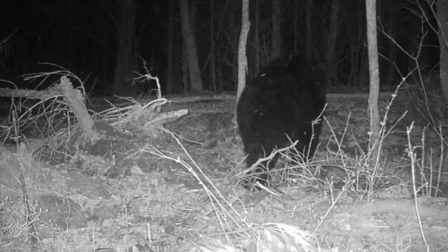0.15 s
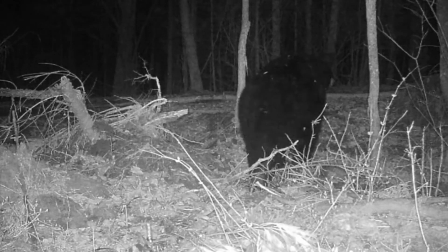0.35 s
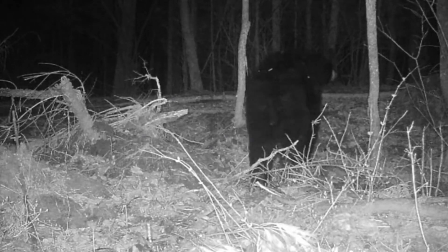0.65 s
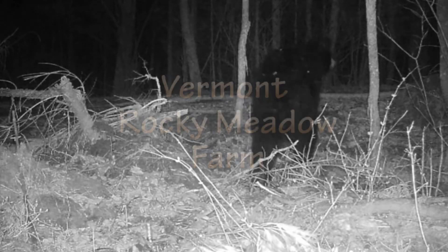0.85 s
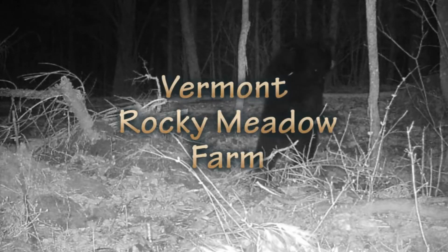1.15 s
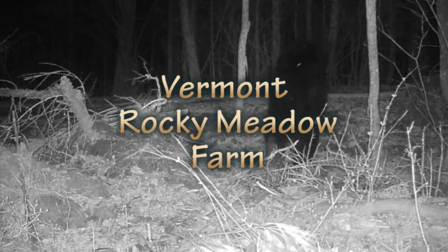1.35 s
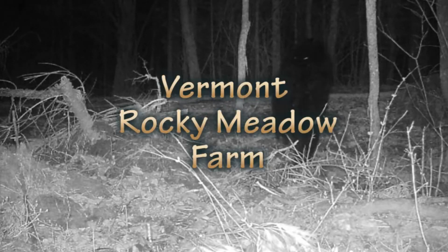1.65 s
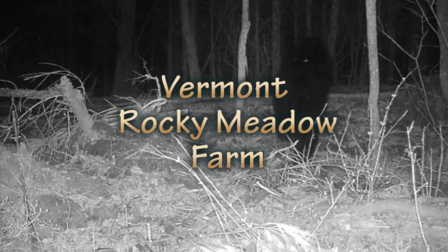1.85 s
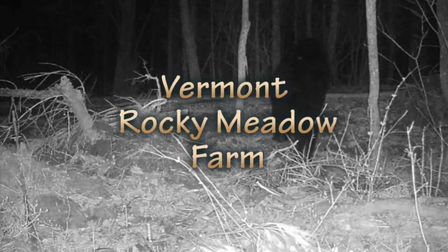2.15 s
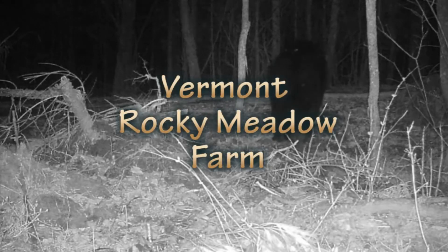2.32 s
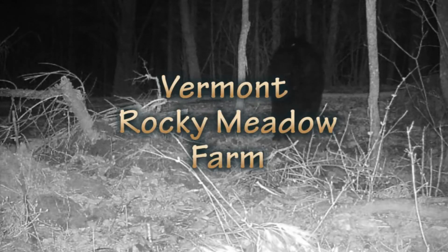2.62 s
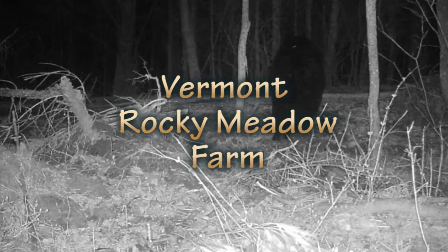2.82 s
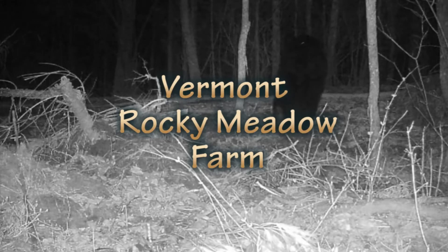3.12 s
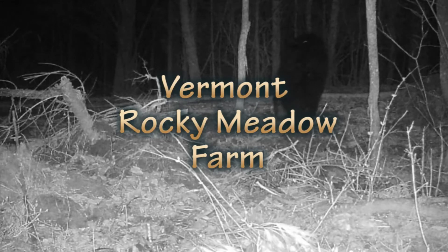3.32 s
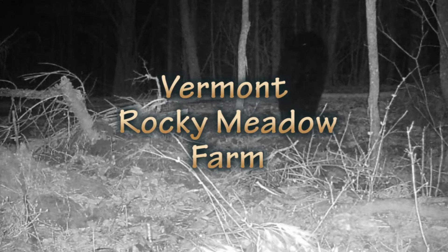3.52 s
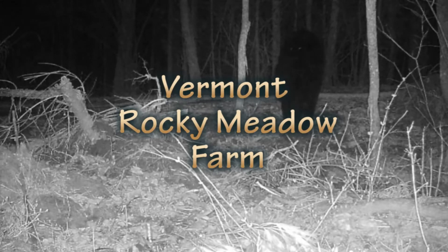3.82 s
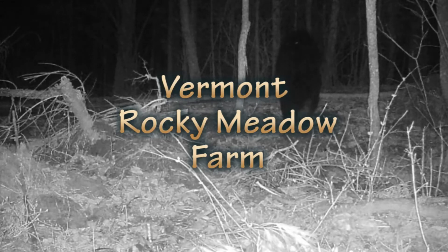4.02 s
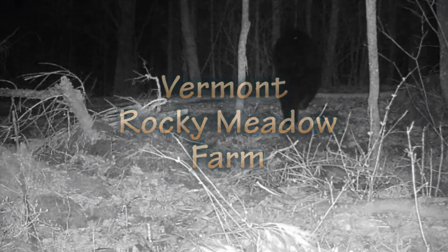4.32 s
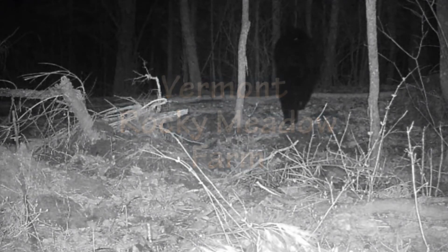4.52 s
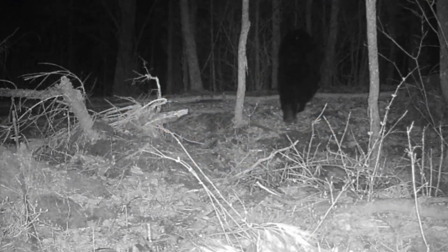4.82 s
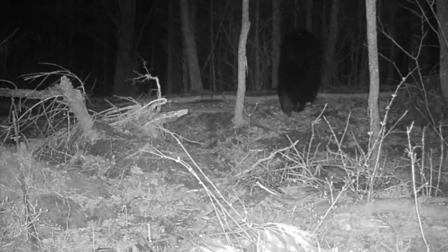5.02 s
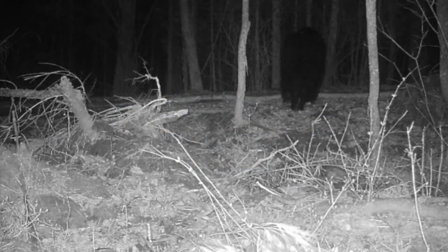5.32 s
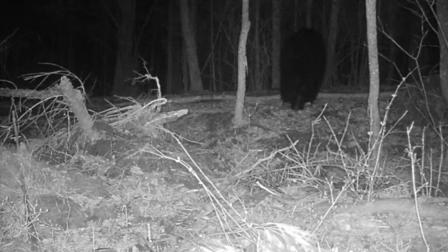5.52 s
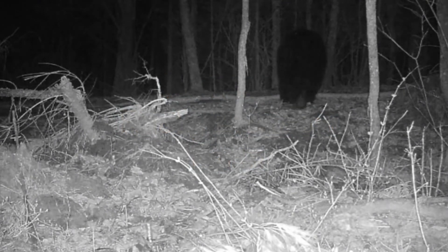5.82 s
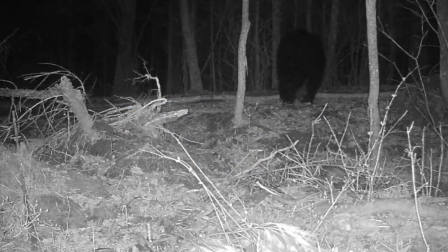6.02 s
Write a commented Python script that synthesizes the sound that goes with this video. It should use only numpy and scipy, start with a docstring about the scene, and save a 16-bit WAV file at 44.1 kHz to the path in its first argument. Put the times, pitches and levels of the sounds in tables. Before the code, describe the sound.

At night in the woods, two owls duet, one hooting a quick clear run, the other cackling hoarsely, over close pulsing cricket chirps.

```python
"""In the woods at night, two owls duet: one hoots a quick run of pure arched notes, the other gives
hoarser cackles and ends on a note that leaps up and falls away. Both are gliding tones with harmonics
shaped by a throat, and trunks scatter the calls into a long tail. A tree cricket chirps close to a
pair of microphones, its wings ringing and rasping at each stroke. Farther crickets sing in short pulses
over a noise chorus of insects, soft air, a faint low hum that sinks away for a while and one tiny tick."""
import sys
import numpy as np
from scipy import signal
from scipy.fft import rfft, irfft
from scipy.io import wavfile
from scipy.ndimage import uniform_filter1d, map_coordinates

SR = 44100
rng = np.random.default_rng(int(sys.argv[2]) if len(sys.argv) > 2 else 0)


def store_pcm(level_fs):
    """Save levels as 16-bit WAV."""
    pcm = np.round(np.clip(level_fs, -1, 1) * 32767).astype(np.int16)
    wavfile.write(sys.argv[1], SR, np.atleast_2d(pcm).T)


N = 271656  # length in samples


def gain_of(db):
    """Turns decibels into an amplitude factor."""
    return 10 ** (np.asarray(db) / 20)


def evened(x):
    """Scales a sound to an rms of 1."""
    return x / np.sqrt(np.mean(x ** 2) + 1e-20)


def read(points, hz):
    """Reads a (f/Hz, value) table between its points, on a log-frequency axis."""
    f, value = np.transpose(points)
    return np.interp(np.log(hz + 1), np.log(f + 1), value)


def add(mix, s, sound):
    """Mixes a sound in at s seconds, cutting off whatever falls outside the mix."""
    at = round(s * SR)
    sound = sound[max(-at, 0):]
    part = mix[max(at, 0):][:len(sound)]
    part += sound[:len(part)]


def noise(spectrum):
    """Random noise of rms 1, coloured by a (f/Hz, level/dB) table."""
    hz = np.fft.rfftfreq(N, 1 / SR)
    white = rng.standard_normal(N)
    return evened(irfft(rfft(white) * gain_of(read(spectrum, hz)), N))


def waver(t, rate_hz):
    """A smooth random wander of about unit size at the times t."""
    chance = rng.standard_normal(2048)
    return map_coordinates(chance, [(t - t[0]) * rate_hz], order=3, mode="wrap")


def two_microphones(x, lag_s, left_db):
    """Left and right: sound reaches the left one lag_s later (earlier if negative) and left_db louder."""
    hz = np.fft.rfftfreq(N, 1 / SR)
    delay = np.exp(-2j * np.pi * hz * lag_s)
    left = irfft(gain_of(left_db) * rfft(x) * delay, N)
    return np.array([left, x])


# How long the woods ring, pitch by pitch: (f/Hz, t/s to die by 60 dB)
WOODS_DECAY = [(200, .6), (550, .9), (1000, .75), (2400, .55), (5000, .45), (9000, .3)]


def woods(x, apart, rise_s):
    """Scatter from many trunks, each band dying at its own speed; apart = how unlike the two sides are."""
    # about 2500 random reflections a second
    taps = rng.standard_normal((2, SR)) * (rng.random((2, SR)) < 2500 / SR)
    hz, t, bands = signal.stft(taps, SR, nperseg=256)
    decay = gain_of(-60 * t / read(WOODS_DECAY, hz)[:, None])
    build_up = 1 - np.exp(-t / rise_s)
    tail = signal.istft(bands * decay * build_up, SR, nperseg=256)[1]
    tail = tail / np.linalg.norm(tail[0])
    mid, side = signal.fftconvolve(x[None], tail, axes=1)[:, :N]
    return np.array([mid + apart * side, mid - apart * side]) / np.hypot(1, apart)


def thicket(x, t60):
    """Dense, quickly dying scatter from the branches around the caller; t60 = seconds to die by 60 dB."""
    t = np.arange(SR // 3) / SR
    build_up = np.minimum(t / .006, 1)
    taps = rng.standard_normal(len(t)) * gain_of(-60 * t / t60) * build_up
    return signal.fftconvolve(x, taps / np.linalg.norm(taps))[:N]


# Countless distant insects, the colour of their noise: (f/Hz, relative level/dB)
CHORUS_COLOUR = [(1300, -43), (1600, -33), (1850, -14), (2050, -5.5), (2300, 6.5), (2500, -6), (2850, -8),
                 (3050, -24.5), (3350, -51.5), (4100, -44.5), (4400, -46), (4900, -47.5), (5500, -48),
                 (12000, -58)]
# Still night air, the colour of its noise: (f/Hz, relative level/dB)
AIR_COLOUR = [(20, -3.5), (60, 3.5), (160, 0.5), (300, -7.5), (600, -11.5), (1000, -20.5), (1500, -30),
              (4000, -43.5), (8000, -28.5), (12000, -35)]
# The hum sinks away for a while: (t/s, level/dB added to HUM_DB)
HUM_LEVEL = [(0, 0.5), (.48, 2.5), (.52, -11.5), (4.0, -10), (4.5, -2), (6.16, 1.5)]
HUM_HZ, HUM_DB = 107.8, -77.5
TICK_S, TICK_DB = .4952, -45


def background():
    """Coloured noise for insects and air, a sine for the hum and a fast-dying pulse for the tick."""
    t = np.arange(N) / SR
    chorus = two_microphones(noise(CHORUS_COLOUR), lag_s=.00022, left_db=-2.2)
    # some insects are heard independently on each side
    chorus += .55 * np.array([noise(CHORUS_COLOUR), noise(CHORUS_COLOUR)])
    flicker_db = .9 * waver(t, 4) + 1.2 * waver(t, 45)
    chorus *= gain_of(flicker_db)
    air = noise(AIR_COLOUR) + .7 * np.array([noise(AIR_COLOUR), noise(AIR_COLOUR)])
    air = air * gain_of([[-2], [0]])  # left is a little softer
    hum_db = HUM_DB + np.interp(t, *np.transpose(HUM_LEVEL))
    hum = np.sqrt(2) * gain_of(hum_db) * np.sin(2 * np.pi * HUM_HZ * t)
    tick = np.zeros(N)
    add(tick, TICK_S, gain_of(TICK_DB) * np.exp(-t[:200] * SR / 2))
    return gain_of(-48.0) * chorus + gain_of(-78.0) * air + hum + tick


def far_cricket(chirps, pitch_hz, strokes_per_s, sag, octave_db):
    """Runs of slightly uneven wing strokes, each a short downward glide; sag = glide as a share of pitch."""
    out = np.zeros(N)
    for s, length, db in chirps:
        t = np.arange(0, length, 1 / SR)
        # u runs from 0 to 1 within each stroke
        u = (np.cumsum(strokes_per_s * (1 + .12 * waver(t, 30))) / SR) % 1
        hz = pitch_hz * (1 + sag * (.5 - u) + .009 * waver(t, 70))
        turns = np.cumsum(hz) / SR
        tone = np.sin(2 * np.pi * turns) + gain_of(octave_db) * np.sin(2 * np.pi * 2 * turns)
        swell = np.sin(np.pi * u) * signal.windows.tukey(len(t), .35)
        add(out, s, gain_of(db) * evened(tone * swell))
    return out


# A slow, low cricket deep in the trees: (t/s, length t/s, level/dB before the trees)
LOW_CRICKET = [(-.2, 0.3, -49.5), (.44, 0.15, -46), (1.07, 0.37, -46), (1.86, 0.37, -46.5),
               (2.72, 0.2, -45), (3.46, 0.33, -46), (4.25, .32, -47), (5.04, 0.4, -49.5),
               (5.89, 0.51, -46.5)]
# A higher cricket farther off: (t/s, length t/s)
HIGH_CRICKET = [(-.07, .11), (0.487, 0.27), (0.762, 0.14), (1.389, 0.1), (1.733, 0.19), (2.026, 0.086),
                (2.657, 0.17), (2.931, 0.11), (3.552, 0.14), (3.87, 0.11), (4.179, 0.11), (4.84, 0.078),
                (5.145, 0.12), (5.743, 0.19), (6.089, .10)]
HIGH_DB = -53  # level of each high chirp before the trees


def far_crickets():
    """Three single singers, blurred by the trees; a neighbour keeps time with the near cricket."""
    high_chirps = [(s, length, HIGH_DB) for s, length in HIGH_CRICKET]
    high = far_cricket(high_chirps, pitch_hz=2490, strokes_per_s=55, sag=.06, octave_db=-27)
    low = far_cricket(LOW_CRICKET, pitch_hz=2055, strokes_per_s=48, sag=0.072, octave_db=-50.0)
    in_step = [(s - .03, .19, db - 17) for s, _, db in NEAR_CHIRPS]
    neighbour = far_cricket(in_step, pitch_hz=2326, strokes_per_s=47, sag=0.082, octave_db=-24)
    into_trees = gain_of(-6) * high + gain_of(-3) * low + gain_of(-3) * neighbour
    wet = woods(into_trees, apart=.2, rise_s=.003)[0]
    heard = gain_of(-1) * high + gain_of(-4) * low + gain_of(-5) * neighbour + wet
    return two_microphones(heard, lag_s=.0002, left_db=-2)


def arch(start, rise_s, fall_s, top_hz, flatness, edge_hz):
    """Times and pitch of a short note: up from edge_hz to a rounded top and down again."""
    t = np.arange(0, rise_s + fall_s, 1 / SR)
    # 0 at the top, 1 at either end
    from_top = np.maximum(1 - t / rise_s, (t - rise_s) / fall_s)
    return start + t, edge_hz + (top_hz - edge_hz) * np.cos(np.pi / 2 * from_top ** flatness)


def long_note(curve):
    """Times, smoothed pitch and level of a drawn-out note."""
    s, pitch, level = np.transpose(curve)
    t = np.arange(s[0], s[-1], 1 / SR)
    smooth_pitch = uniform_filter1d(np.interp(t, s, pitch), size=500, mode="nearest")
    return t, smooth_pitch, np.interp(t, s, level)


def off_resonance(throat, hz):
    """Level in dB of a partial against one at the throat's strongest resonance (0 or below)."""
    return read(throat, hz) - max(db for _, db in throat)


def voice(notes, throat, overtone_db, rolloff_db, bright, jitter, rough, attack_s, release_s):
    """Gliding tones of five harmonics, whose balance shifts as they pass the throat's resonance."""
    out = np.zeros(N)
    k = np.arange(1, 6)[:, None]  # harmonic number
    for t, pitch, level in notes:
        hz = pitch * (1 + jitter * waver(t, 150))
        # with bright above 0, a softer note has weaker upper harmonics
        upper_db = (rolloff_db + bright * (level.max() + 40.5)) * np.maximum(k - 2, 0)
        weights = gain_of(read(throat, k * hz) + overtone_db * (k > 1) + upper_db)
        partials = weights * np.sin(2 * np.pi * k * np.cumsum(hz) / SR)
        # keep the tone's power steady whatever the balance
        tone = partials.sum(0) / np.sqrt((weights ** 2).sum(0) / 2)
        ramp = np.minimum((t - t[0]) / attack_s, (t[-1] - t) / release_s)
        envelope = np.sin(np.pi / 2 * np.clip(ramp, 0, 1))
        add(out, t[0], tone * gain_of(level) * (1 + rough * waver(t, 260)) * envelope)
    return out


# Arched cackles: (start t/s, rise t/s, fall t/s, top f/Hz, mid-note level/dB before the throat's loss)
CACKLE_NOTES = [ (-.08, 0.075, 0.044, 255, -59.5), (0.221, .06, .045, 294.8, -54),
                (.572, .052, .037, 304.7, -50), (.926, 0.06, 0.045, 300, -49),
                (1.27, 0.074, 0.042, 279, -45.5), (1.613, 0.048, 0.05, 224, -44.5),
                (1.97, 0.046, 0.056, 245, -43), (2.324, 0.067, 0.057, 272, -42.5),
                (2.668, .101, 0.079, 300, -41.5), (3.006, 0.09, 0.055, 328, -41.5),
                (3.359, 0.093, 0.061, 335, -42), (3.685, 0.1, 0.053, 355, -42),
                (4.016, .102, 0.054, 343, -41)]
# The last note, leaping up and falling away: (t/s, f/Hz, level/dB before last_db)
LAST_CACKLE_CURVE = [(4.24, 217, -40.5), (4.264, 299, -38.5), (4.302, 307.6, -40.5), (4.35, 413.5, -41.5),
                     (4.384, 447.3, -39.5), (4.42, 399, -42.5), (4.446, 309.6, -39.5), (4.492, 252.8, -40),
                     (4.548, 220.6, -46), (4.618, 204, -51), (4.68, 167.7, -52)]
# What the cackling owl's throat lets through: (f/Hz, relative level/dB)
CACKLE_RESONANCE = [(190, -25), (260, -12.5), (320, -4.5), (430, 4), (600, 7.5), (720, -5.5), (850, -13),
                    (1040, -23.5), (1220, -46.5), (1500, -67.5)]
CACKLE_EDGE_HZ = 185  # pitch as a cackle starts and ends
CACKLE_FLATNESS = .9  # under 1 the top is pointed, over 1 it is held
CACKLE_ROUGH = .12  # flutter of the level (0-1)


def cackling_owl(throat_share=0.73, last_db=-2.0, sag_db_per_s=35):
    """Low, hoarse arches carried by their second harmonic, each losing force; then one long note."""
    t, hz, level = long_note(LAST_CACKLE_CURVE)
    notes = [(t, hz, level + last_db)]
    for *shape, db in CACKLE_NOTES:
        t, hz = arch(*shape, CACKLE_FLATNESS, CACKLE_EDGE_HZ)
        effort_db = db - sag_db_per_s * (t - t.mean())
        throat_db = throat_share * off_resonance(CACKLE_RESONANCE, 2 * hz)
        notes.append((t, hz, effort_db + throat_db))
    return voice(notes, CACKLE_RESONANCE, overtone_db=1.0, rolloff_db=-1.0, bright=0.97, jitter=0.0048,
                 rough=CACKLE_ROUGH, attack_s=0.036, release_s=0.0077)


# Near cricket, one row a chirp: (t/s, number of wing strokes, level/dB before the harmonics' own levels)
NEAR_CHIRPS = [(0.172, 5, -31), (0.581, 5, -30.5), (0.989, 8, -31), (1.481, 5, -32), (1.876, 5, -30.5),
               (2.269, 8, -31.5), (2.74, 5, -30.5), (3.144, 8, -33), (3.617, 5, -31), (4.025, 5, -30.5),
               (4.453, 8, -31), (4.93, 8, -32), (5.393, 5, -31.5), (5.814, 8, -31)]
# When each stroke of a chirp begins, in groups of two, three and three: (t/s after the chirp's start)
STROKE_TIMES = [0, .0225, .0505, .0725, .096, .125, .1485, .171]
# Harmonics of the ringing wings, from the fundamental up: (level/dB at full force)
WING_HARMONICS = [2.5, -23, -27.5, -48.5]
# The colour of the scraping noise: (f/Hz, relative level/dB)
RASP_COLOUR = [(900, -58.5), (1500, -20), (2000, 6.5), (2800, -2), (3400, -6.5), (4400, -6.5), (5400, -14),
               (5900, -46), (6300, -11.5), (7000, -13.5), (8200, -37.5), (9400, -14.5), (10300, -36.5),
               (12000, -44.5)]
# The near cricket in the left microphone against the right: (f/Hz, level/dB)
CRICKET_LEFT_LEVEL = [(2400, -1.8), (4800, -4), (7100, -8), (8000, -2), (9400, .5)]
LEFT_LAG_S = 7.5 / SR


def near_cricket(start_hz=2505, end_hz=2255, stroke_s=0.023, rasp_db=-29):
    """Each closing of the wings rings them at a pitch that sags as the scraper slows."""
    song, swing = np.zeros(N), np.zeros(N)
    t = np.arange(0, stroke_s, 1 / SR)
    u = t / stroke_s
    shape = np.sin(np.pi * u ** .85) ** 1.2
    glide_hz = end_hz + (start_hz - end_hz) * (1 - u) ** 1.22
    for s, strokes, db in NEAR_CHIRPS:
        for delay in STROKE_TIMES[:round(strokes)]:
            hz = glide_hz * (1 + 0.0054 * rng.standard_normal() + 0.011 * waver(t, 300))
            turns = rng.random() + np.cumsum(hz) / SR
            # the first strokes of a chirp are weaker
            warm_up = 1 - 0.26 * np.exp(-delay / 0.015)
            force = shape * warm_up * gain_of(.5 * rng.standard_normal())
            tone = np.zeros(len(t))
            for k, level in enumerate(WING_HARMONICS):
                # a firmer stroke is brighter
                strength = gain_of(level) * force ** (1 + 0.98 * k)
                tone += strength * np.sin(2 * np.pi * (k + 1) * turns)
            add(song, s + delay, np.sqrt(2) * gain_of(db) * tone)
            add(swing, s + delay, gain_of(db) * force)
    song += gain_of(rasp_db) * swing * noise(RASP_COLOUR)
    scatter = woods(gain_of(-14.5) * song, apart=.9, rise_s=.006)
    near = song + gain_of(-4) * thicket(song, t60=0.027)
    left_db = read(CRICKET_LEFT_LEVEL, np.fft.rfftfreq(N, 1 / SR))
    return two_microphones(near, LEFT_LAG_S, left_db) + scatter


# Arched hoots: (start t/s, rise t/s, fall t/s, top f/Hz, flatness of the top,
# level/dB before the throat's loss)
HOOT_NOTES = [ (0.241, 0.057, .03, 357.5, 0.72, -47), (.595, 0.07, 0.043, 533, .79, -37.5),
              (.949, 0.081, 0.058, 549, 1.1, -35), (1.307, 0.079, 0.061, 561.7, 1.31, -32.5),
              (1.669, 0.08, 0.074, 571.2, 1.41, -32), (2.026, .083, 0.076, 581.6, 1.43, -32),
              (2.383, 0.075, 0.089, 585.7, 1.56, -31.5)]
# The drawn-out last hoot: (t/s, f/Hz, level/dB)
LAST_HOOT_CURVE = [(2.595, 294.6, -52.5), (2.621, 429.2, -34), (2.641, 551.2, -33.5), (2.699, 579, -39.5),
                   (2.769, 578.5, -42.5), (2.809, 541.6, -35), (2.833, 500, -27), (2.855, 377.7, -40.5),
                   (2.923, 317, -51.5), (2.97, 293, -61.5)]
# What the hooting owl's throat lets through: (f/Hz, relative level/dB)
HOOT_RESONANCE = [(250, -6.5), (400, -1), (520, 8), (590, 1), (700, -5.5), (850, -26), (1100, -37),
                  (1500, -69)]
HOOT_EDGE_HZ = 255  # pitch as a hoot starts and ends
HOOT_ROUGH = .05  # flutter of the level (0-1)


def hooting_owl():
    """Nearly pure arches, loudest where the pitch crosses the throat's resonance, then one long note."""
    notes = [long_note(LAST_HOOT_CURVE)]
    for *shape, db in HOOT_NOTES:
        t, hz = arch(*shape, HOOT_EDGE_HZ)
        notes.append((t, hz, db + off_resonance(HOOT_RESONANCE, hz)))
    return voice(notes, HOOT_RESONANCE, overtone_db=-10.5, rolloff_db=0, bright=0, jitter=0.0024,
                 rough=HOOT_ROUGH, attack_s=0.017, release_s=0.02)


# Echoes off nearby trunks and the forest edge: (delay t/s, level/dB)
TRUNK_ECHOES = [(.017, -22.5), (.034, -10.5), (.056, -20), (.083, -18), (.115, -26.5), (0.218, -22),
                (.36, -29.5)]


def owls():
    """The cackling owl sits farther off, so more of its voice comes by way of the trees."""
    hoots, cackles = hooting_owl(), cackling_owl()
    direct = hoots + cackles
    echoes = thicket(gain_of(-17) * hoots + gain_of(-13.5) * cackles, t60=.4)
    for delay, db in TRUNK_ECHOES:
        add(echoes, delay, gain_of(db) * direct)
    tail = woods(gain_of(-19) * hoots + gain_of(-10) * cackles, apart=.1, rise_s=.01)
    return two_microphones(direct + echoes, lag_s=-.00002, left_db=-.5) + tail


def scene():
    """Adds up the owls, the crickets and the night around them."""
    return owls() + near_cricket() + far_crickets() + background()


EDGE_HZ = 11950  # the treble is cut above this


def record(dry):
    """Softens the two ends and limits the treble with a steep low-pass filter."""
    soft = dry * signal.windows.tukey(N, .002)
    low_pass = signal.firwin(511, EDGE_HZ, window=("kaiser", 9), fs=SR)
    return signal.oaconvolve(soft, low_pass[None], "same")


dry = scene()
out = record(dry)
store_pcm(out)
```